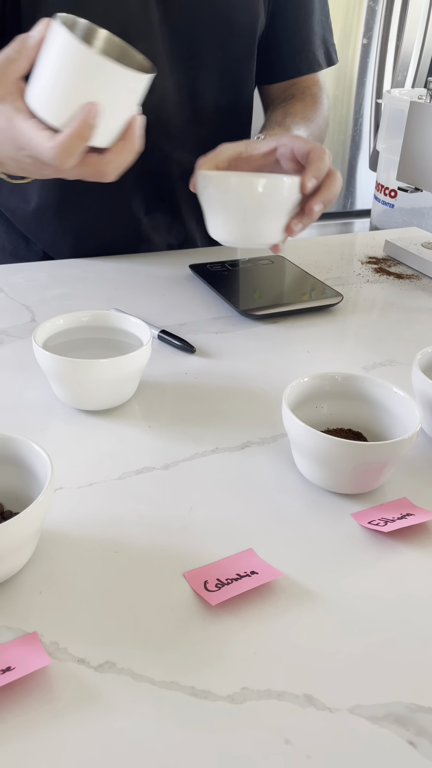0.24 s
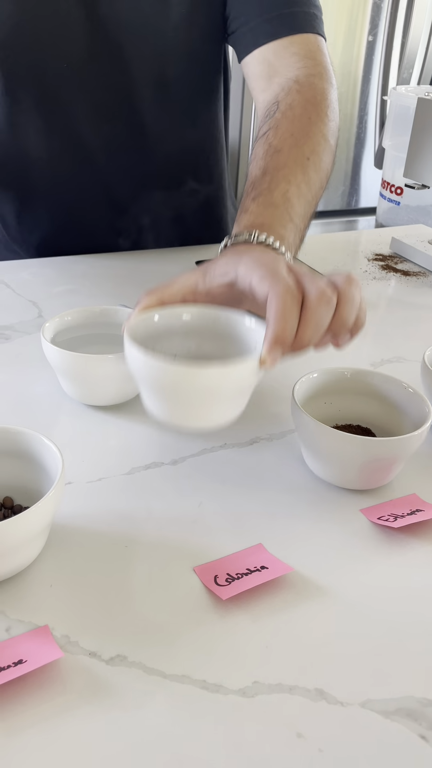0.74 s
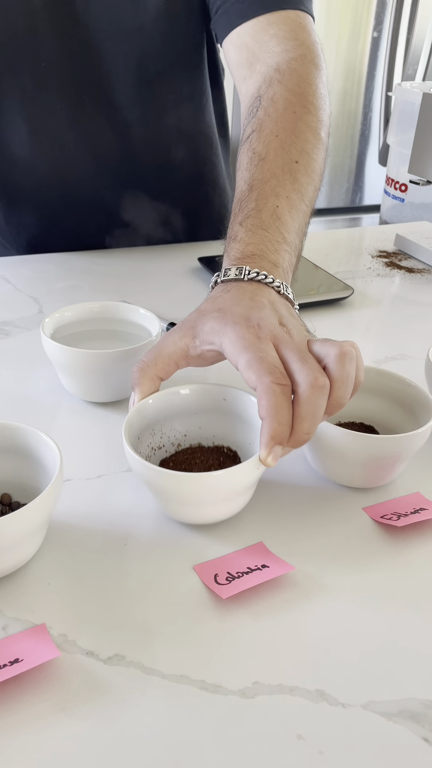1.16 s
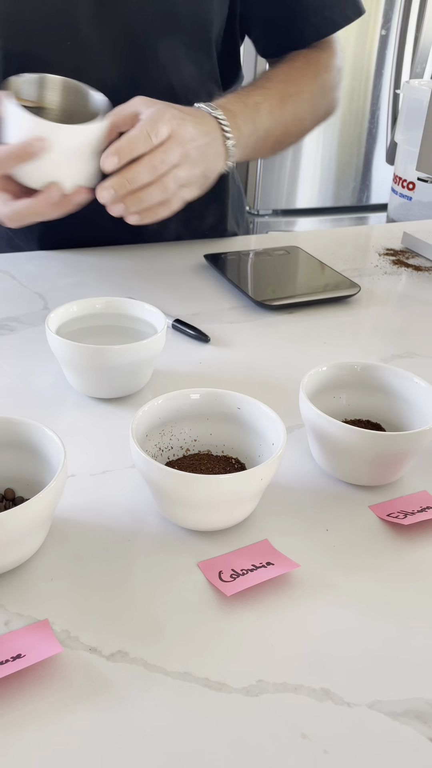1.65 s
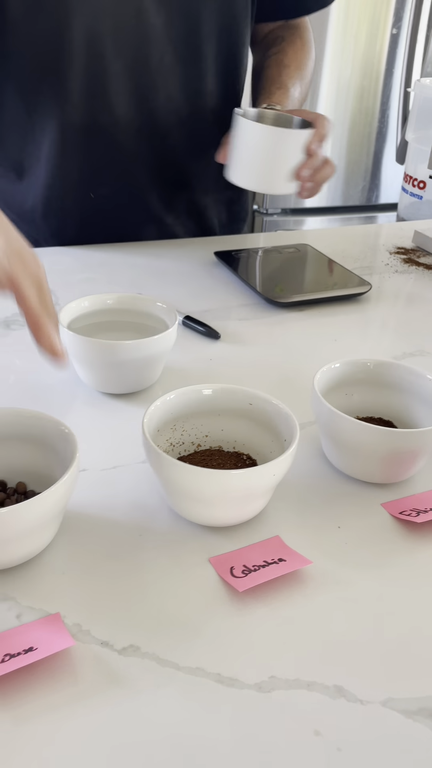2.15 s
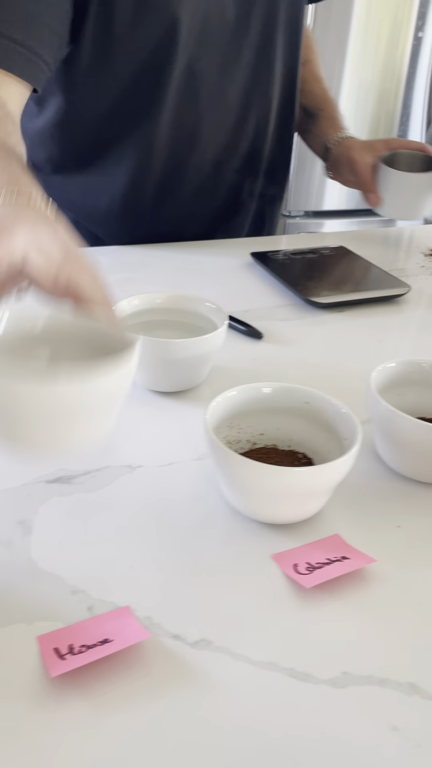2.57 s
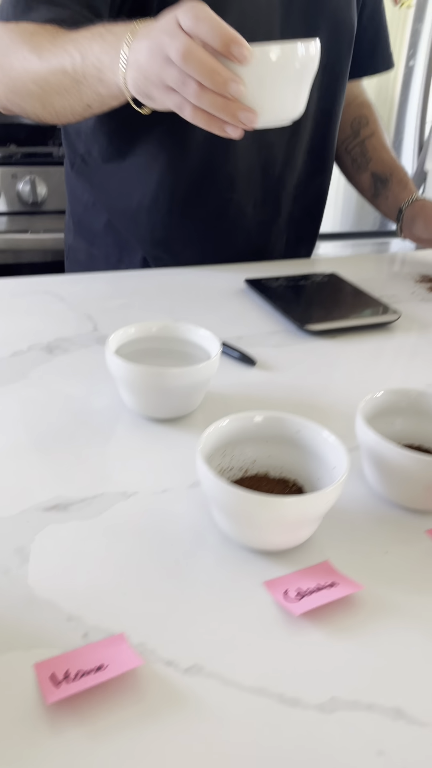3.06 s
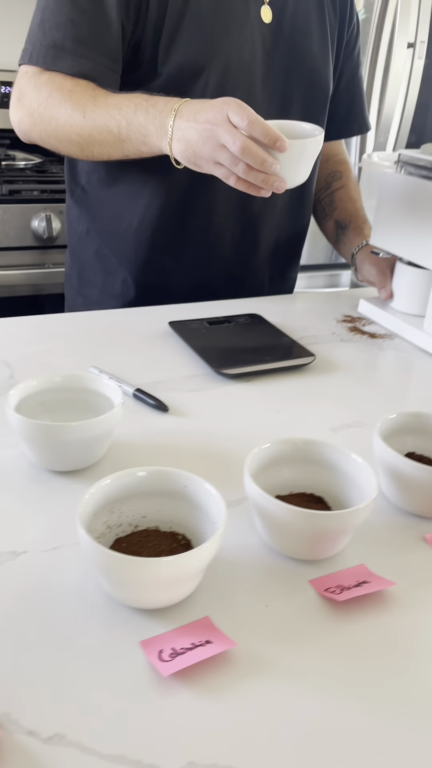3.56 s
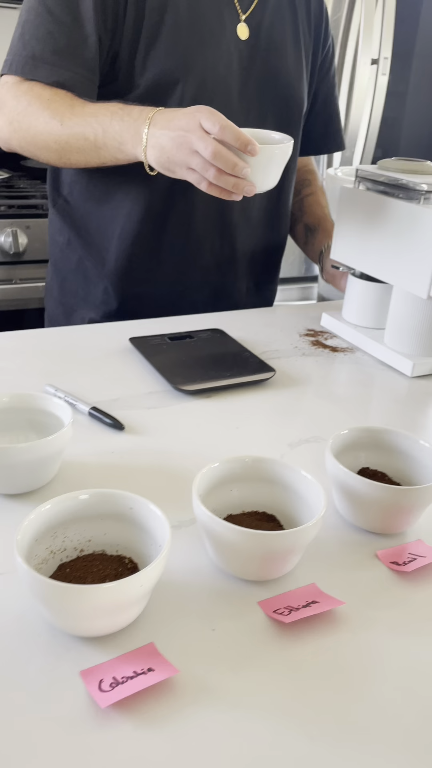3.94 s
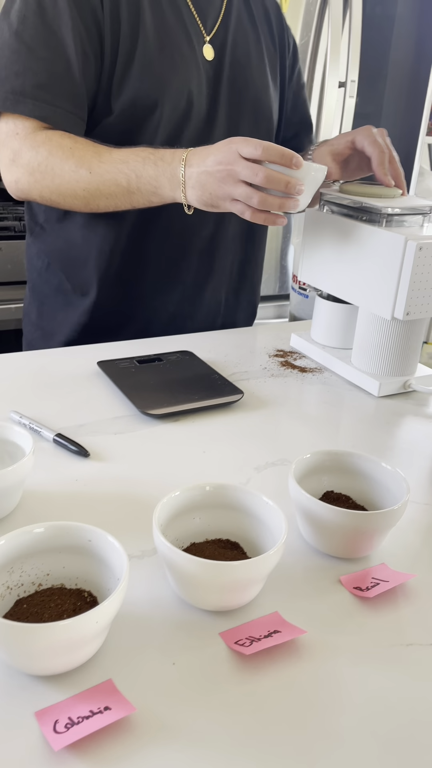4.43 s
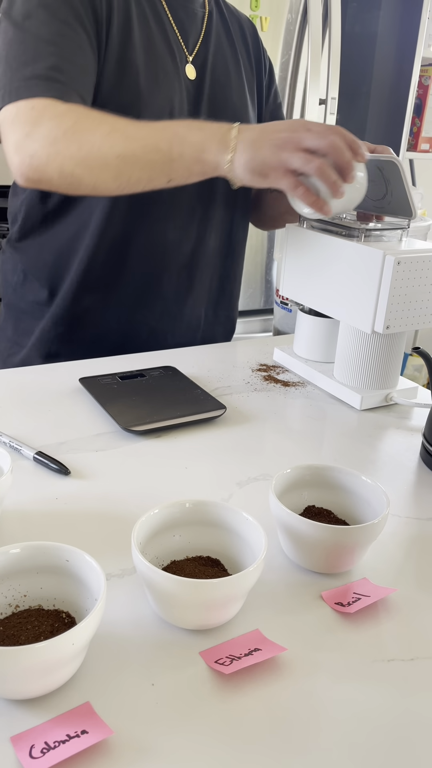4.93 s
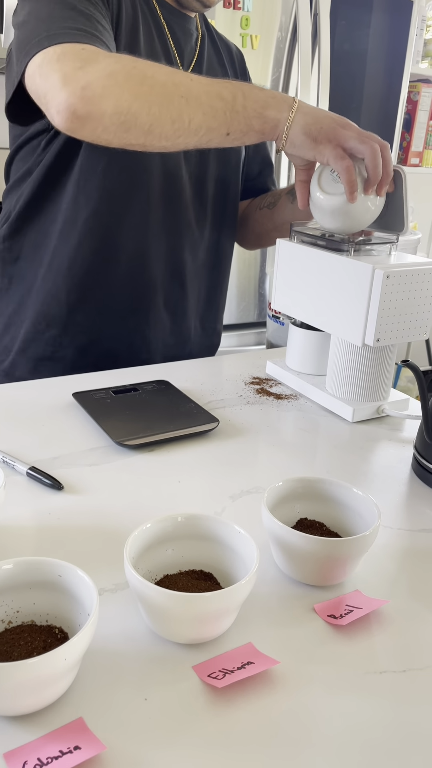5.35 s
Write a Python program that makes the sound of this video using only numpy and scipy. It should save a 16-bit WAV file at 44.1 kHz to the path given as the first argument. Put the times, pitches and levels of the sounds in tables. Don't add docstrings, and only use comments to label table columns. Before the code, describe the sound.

In a quiet hard-walled kitchen, faint fingertip ticks lead to a loud double knock of a ceramic bowl landing on stone. Another bowl drags off with a short gritty ring. A metal cup knocks and scrapes into a grinder farther away, a hollow plastic lid clicks open, and beans clatter into the hopper in a fast-thinning burst. A faint motor hums beyond. Phone microphone close to the bowls.

```python
import sys
import numpy as np
from scipy import signal
from scipy.fft import rfft, irfft, next_fast_len
from scipy.io import wavfile
from scipy.ndimage import uniform_filter1d

SR = 44100
rng = np.random.default_rng(int(sys.argv[2]) if len(sys.argv) > 2 else 0)


def undo_db(level):
    steps = np.asarray(level, float) / 20
    return 10 ** steps


def store_wav(level_fs):
    pcm = np.round(np.clip(np.atleast_2d(level_fs), -1, 1) * 32767)
    wavfile.write(sys.argv[1], SR, pcm.T.astype(np.int16))


N = 246940
TIME = np.arange(N) / SR
PADDED = next_fast_len(N)
FREQ = np.fft.rfftfreq(PADDED, 1 / SR)


def level(x, db):
    return x * undo_db(db) / np.sqrt(np.mean(x ** 2))


def colour(x, spectrum):
    hz, db = np.transpose(spectrum)
    gain = undo_db(np.interp(np.log(FREQ + 1), np.log(hz), db))
    return irfft(rfft(x, PADDED) * gain, PADDED)[..., :N]


def band(x, lo_hz, hi_hz):
    return signal.sosfilt(signal.butter(2, [lo_hz, hi_hz], "bandpass", fs=SR, output="sos"), x)


def walk(rate):
    k = int(SR / rate)
    steps = np.repeat(rng.standard_normal(N // k + 1), k)
    return 0.48 * uniform_filter1d(uniform_filter1d(steps, k), k)[:N]


def fade(t, t60):
    return np.exp(-np.log(1000) * t / t60)


def swell(peak_s, rise_s, fall_s, db):
    return undo_db(db - 20 * np.maximum((peak_s - TIME) / rise_s, (TIME - peak_s) / fall_s))


def add(out, start_s, sound):
    i = int(start_s * SR)
    out[i:i + len(sound)] += sound[:N - i]


def tone(hz, gain, wobble_db, rate):
    return np.sqrt(2) * np.sin(2 * np.pi * hz * TIME) * gain * undo_db(wobble_db * walk(rate))


def grains(per_second, scatter_db, t60):
    struck = rng.random(N) < per_second / SR
    sizes = struck * undo_db(scatter_db * rng.exponential(size=N))
    power = signal.lfilter([1], [1, -fade(2 / SR, t60)], sizes ** 2)
    return rng.standard_normal(N) * np.sqrt(power)


# pitch_hz, level_db (per Hz)
AIR_COLOUR = [(22, -22), (36, -6), (70, -6.5), (130, -4.5), (250, -8.5), (500, -13.5), (1000, -17),
              (2000, -23), (2800, -29), (3400, -38.5), (6000, -41), (10000, -34.5), (13000, -38),
              (15500, -58.5)]
# pitch_hz, level_db
MAINS_LINES = [(60, -62), (120, -64.5)]


def air():
    noise = level(colour(rng.standard_normal((2, N)), AIR_COLOUR), 0)
    low = signal.sosfilt(signal.butter(1, 300, fs=SR, output="sos"), noise)
    high = noise - low
    rumble = low * undo_db(-54.5 + 0.66 * TIME + 0.64 * walk(9.4))
    hiss = high * undo_db(-63.0 + 1.8 * walk(3.5))
    lines = sum(undo_db(db + 2.5 * walk(2)) * np.sin(2 * np.pi * hz * TIME) for hz, db in MAINS_LINES)
    return rumble + hiss + np.array([[1], [0]]) * lines


# start_s, level_db, pitch_hz
TICK_EVENTS = [(0.1244, -66, 6600), (0.1604, -54, 5900), (0.2368, -58, 6570), (0.395, -50, 4230),
               (0.4369, -43, 4170), (1.6665, -52.5, 6900), (1.7079, -60.5, 7100), (1.8484, -46.5, 7400),
               (2.0134, -73, 4120), (2.266, -53, 4260), (2.4199, -44, 5580), (2.458, -65, 5390),
               (2.51, -46.5, 6300), (4.1724, -71.5, 6900)]


def ticks():
    out, t = np.zeros(N), TIME[:1500]
    for start_s, db, hz in TICK_EVENTS:
        click = 0.5 * np.diff(rng.standard_normal(len(t) + 1)) * fade(t, 0.031)
        pitched = 0.9 * band(click, hz / 1.15, hz * 0.93)
        broad = click * undo_db(0.8 * (db + 42.5))
        ring = 0.2 * np.sin(2 * np.pi * hz * t) * fade(t, 0.015)
        add(out, start_s, undo_db(db) * (broad + pitched + ring))
    return out


# peak_s, rise_s, fall_s (for 20 dB), dull_rub_db, fine_rustle_db
GESTURES = [(0.14, .015, .03, -73, -95), (0.394, 0.088, .07, -58, -74), (0.434, .01, 0.128, -57, -70.5),
            (0.56, .2, 0.36, -71.5, -74.5), (0.918, 0.012, 0.17, -55, -83), (1.03, 0.16, 0.17, -70, -79.5),
            (1.5, 0.18, 0.073, -50.5, -71), (1.67, 0.028, 0.14, -78, -77.5), (1.766, 0.061, 0.17, -54, -62),
            (2.018, .03, 0.18, -62.5, -71.5), (2.334, .12, .12, -91, -77.5),
            (2.41, 0.13, 0.23, -74.5, -64.5), (2.65, 0.27, 0.32, -78, -83.5), (2.848, .04, 0.2, -71, -81),
            (3.05, .03, .2, -56, -57), (3.36, 0.23, .05, -44, -57.5), (3.384, 0.018, 0.079, -53, -54.5),
            (3.54, 0.4, 0.53, -51.5, -67), (3.64, 0.011, 0.043, -51, -55), (3.71, 0.016, 0.061, -69, -49),
            (4.33, 0.21, .02, -58, -66.5), (4.445, 0.011, 0.023, -56, -42), (4.97, 0.038, 0.49, -62, -52),
            (5.135, .08, 0.05, -76, -53.5)]
# pitch_hz, level_db (per Hz)
RUB_COLOUR = [(400, -18), (700, -0.5), (1400, -2), (2200, -11.5), (2700, -0.5), (3200, -10.5), (5000, -21)]
# pitch_hz, level_db (per Hz)
RUSTLE_COLOUR = [(2500, -9), (3500, -2), (5400, -9.5), (5900, 2), (6500, -11), (9000, 5.5), (11000, -9),
                 (13000, -2.5), (15500, -9.5)]


def handling():
    rub = level(colour(grains(2507, 0.79, 0.01), RUB_COLOUR), -12.5)
    rustle = level(colour(grains(2500, 2.0, 0.0094), RUSTLE_COLOUR), 0.23)
    out = np.zeros(N)
    for peak_s, rise_s, fall_s, dull_db, fine_db in GESTURES:
        friction = rub * undo_db(dull_db) + rustle * undo_db(fine_db)
        out += swell(peak_s, rise_s, fall_s, 0) * friction
    return out


# pitch_ratio (to the thud), level_db
THUD_PARTIALS = [(0.548, -6), (0.679, -7.5), (.83, -4), (1, 5), (1.2, -8), (1.448, 4), (1.752, -8.5),
                 (2.103, -18)]


def blows(table, modes, clack_t60, crack_hz, crack_t60, rattle_t60, ring_db):
    out, t = np.zeros((2, N)), TIME[:SR // 4]
    column = t[:, None]
    mode_hz, mode_db, mode_t60 = np.transpose(modes)
    ratio, share_db = np.transpose(THUD_PARTIALS)
    click = 1.0 * (t == 0)
    for start_s, db, hz, clack_db, crack_db in table:
        chance, noise = rng.standard_normal((2, 20)), rng.standard_normal((3, len(t)))

        cycles = hz * ratio * column
        partials = np.sin(2 * np.pi * cycles + 0.13 * chance[0, :len(ratio)])
        thud = (partials * fade(cycles, 5.5)) @ undo_db(share_db - 3.5)
        thud = thud * (1 - np.exp(-(1.3 * hz * t) ** 2))

        swing = np.sin(2 * np.pi * mode_hz * column) * (1 - np.exp(-(mode_hz * column) ** 2))
        body = (swing * fade(column, mode_t60)) @ undo_db(mode_db + 1.5 * chance[1, :len(modes)])
        rattle = click + noise[0] * fade(t, rattle_t60) / 35
        rattle = rattle / np.linalg.norm(rattle)
        ring = undo_db(ring_db - 0.14 * db) * signal.fftconvolve(body, rattle)[:len(t)]

        clack = band(band(noise[1] * fade(t, clack_t60), 1170, 3600), 1170, 3600)
        clack = undo_db(clack_db + 6.0) * clack
        crack = undo_db(crack_db) * band(noise[2] * fade(t, crack_t60), crack_hz, 14500)

        edges = (0.5 * hz, 2.13 * hz), (1500, 2900), (crack_hz, 12000)
        spread = 0
        for edge, part in zip(edges, (thud, clack, crack)):
            even = band(band(click, *edge), *edge)
            spread = spread + even * np.linalg.norm(part) / np.linalg.norm(even)
        add(out[0], start_s, undo_db(db) * (thud + clack + crack + ring))
        add(out[1], start_s, undo_db(db) * (spread + 0.67 * ring))
    return signal.sosfilt(signal.butter(2, 110, "highpass", fs=SR, output="sos"), out)


# start_s, thud_db, thud_hz, clack_db, crack_db (last two relative to the thud)
BOWL_HITS = [
    (0.475, -46, 1040, -15, -20),
    (1.062, -29.5, 1250, -12.5, -40.5),
    (1.071, 3.5, 1206, -24, -51.5),
    (1.226, 1.5, 1220, -19, -25),
    (1.241, -3.5, 1220, -8, -32),
]
# pitch_hz, level_db, t60_s
BOWL_MODES = [(137.9, -18, 0.25), (239.4, -19, 0.15), (405, -27, 0.24), (530, -3.5, 0.031), (816, 0, 0.06),
              (912, -2.5, 0.036), (1121, -3, 0.04), (1216, -5, 0.05), (1332, 0, 0.033), (1510, -4, 0.035),
              (1750, -13, 0.064), (1843, -6, 0.06), (2058, -9, 0.031), (2550, -30.5, 0.16),
              (3015, -34, 0.2)]
# pitch_hz, level_db, t60_s
GLAZE_MODES = [(9150, -34, .12), (13200, -31, .09), (13400, -31, .07), (13600, -34, .06)]


def bowl():
    return blows(BOWL_HITS, BOWL_MODES + GLAZE_MODES, clack_t60=0.021, crack_hz=4200, crack_t60=0.0074,
                 rattle_t60=0.052, ring_db=-14.5)


# peak_s, rise_s, fall_s (for 20 dB), level_db, pitch_hz
CLINK_EVENTS = [(.476, 0.0057, 0.027, -60, 4544), (.926, .014, 0.022, -80, 4515)]


def clinks():
    return sum(tone(hz, swell(*shape), 3, 33) for *shape, hz in CLINK_EVENTS)


# peak_s, rise_s, fall_s (for 20 dB), level_db
DRAG_SWELL = [(2.382, .045, .04, -35)]


def drag():
    t = TIME[:SR // 5, None]
    hz, db, t60 = np.transpose(BOWL_MODES + GLAZE_MODES)
    tilt_db = np.where(hz > 5000, 12, -8 * abs(np.log2(hz / 1200)))
    body = (np.sin(2 * np.pi * hz * t) * fade(t, 0.8 * t60)) @ undo_db(db + tilt_db)
    slips = level(signal.fftconvolve(grains(900, 4.6, 0.0047), body)[:N], 0)
    return slips * swell(*DRAG_SWELL[0])


# start_s, thud_db, thud_hz, clack_db, crack_db (last two
CUP_HITS = [(2.841, -24, 750, -21, -28), (2.852, -51, 780, -42, -39), (3.018, -24, 750, -4, -7),
            (3.336, -32.5, 1350, -10, -38.5), (3.424, -37, 698, 0.5, -28), (3.453, -43, 465, -1.5, -11),
            (3.611, -42, 686, -19, -38), (3.636, -56, 490, 13.5, -28), (3.685, -25, 513, -22, -35),
            (3.719, -30.5, 840, -2, -18), (3.724, -31, 630, -0.5, -19), (3.741, -23.5, 675, -41, 6),
            (3.748, -21, 600, -29, -6)]
# pitch_hz, level_db, t60_s
CUP_MODES = [(137, -1.5, 0.25), (267, -1, 0.1), (512, -5.5, 0.16), (689, 10.5, 0.035), (779, -2, 0.13),
             (1148, -0.5, 0.041), (1430, -17, 0.18), (1957, -11, 0.05), (2506, -13, 0.05),
             (2870, -42, 0.03), (4560, -28, 0.12), (5900, -26, 0.1)]


def cup():
    return blows(CUP_HITS, CUP_MODES, clack_t60=0.011, crack_hz=4730, crack_t60=0.013,
                 rattle_t60=0.063, ring_db=-23)


# peak_s, rise_s, fall_s (for 20 dB), level_db, pitch_hz
SQUEAK_EVENTS = [(3.565, .15, .1, -45, 476)]


def squeak():
    return sum(tone(hz, swell(*shape), 1.2, 30) for *shape, hz in SQUEAK_EVENTS)


def hum():
    on_s, off_s, rise_s, stop_s = 4.12, 5.32, 0.12, 0.03
    running = np.clip(np.minimum((TIME - on_s) / rise_s, (off_s - TIME) / stop_s), 0, 1)
    sagging_db = -53 - 1.5 * (TIME - on_s)
    return tone(132.4, running * undo_db(sagging_db), 2.6, 2.8)


# start_s, thud_db, thud_hz, clack_db, crack_db (last two relative to the thud)
LID_HITS = [
    (4.238, -40, 151, -13, -24),
    (4.26, -39, 357, -12.5, -30),
    (4.301, -33, 151, -20, -32),
    (4.338, -23, 490, -15, -17.5),
    (4.441, -3.5, 498, -12, -16.5),
    (4.775, -27.5, 400, -15, -26),
    (4.792, -22, 390, -14, -21),
    (4.971, -13, 540, -16, -19),
]
# pitch_hz, level_db, t60_s
LID_MODES = [(142, -18, 0.095), (240, 1, 0.035), (294, -9, 0.027), (400, -6, 0.033), (498, -2, 0.068),
             (581, -9, .045), (818, -8, 0.03), (1194, -4, 0.024), (1427, -14.5, 0.091), (1690, 2, 0.01),
             (2340, -24, 0.11), (3480, -9.5, 0.025), (4600, -48, 0.09), (6260, -26, 0.045)]


def lid():
    return blows(LID_HITS, LID_MODES, clack_t60=0.033, crack_hz=3580, crack_t60=0.032,
                 rattle_t60=0.078, ring_db=-14.5)


# start_s, level_db
BEAN_STRIKES = [(5.1425, -15), (5.1515, -20.5), (5.1577, -14), (5.1685, -4), (5.1689, -9.5), (5.1737, -21),
                (5.1807, -18), (5.1864, -32), (5.2014, -12.5), (5.2298, -24), (5.2551, -15.5),
                (5.3074, -30.5), (5.3421, -18), (5.4413, -28.5), (5.4876, -35), (5.5795, -36.5)]
# pitch_hz, level_db (per Hz)
HOPPER_COLOUR = [(300, -39), (600, -21.5), (900, -9), (1500, -10.5), (2200, -3), (3200, -7), (4500, -5.5),
                 (6000, -5.5), (8000, -2.5), (10500, -3.5), (13000, -6), (15500, -11.5)]


def beans():
    pour_s, empty_s = 5.168, 5.345
    late = np.maximum(TIME - empty_s, 0)
    flow_db = -26 - 50.5 * (TIME - late - pour_s)
    flow_db = flow_db - 74 * late - 3.5 * np.minimum(late / 0.022, 1)
    shower = level(grains(2600, 1.9, 0.004), 0) * undo_db(flow_db) * (TIME > pour_s)
    for start_s, db in BEAN_STRIKES:
        add(shower, start_s, undo_db(db - 4.5) * rng.standard_normal(900) * fade(TIME[:900], 0.011))
    return level(colour(shower, HOPPER_COLOUR), 10 * np.log10(np.mean(shower ** 2)))


# pitch_hz, level_db
ROOM_BANDS = [(150, -9.5), (400, -6.5), (1000, -6.5), (2500, -9), (6000, -12.5), (12000, -12.5)]
ROOM_DECAYS = [.38, .42, .48, .47, .43, .33]


def room(x):
    t = TIME[:int(0.8 * SR)]
    tail = 0
    for (hz, db), t60 in zip(ROOM_BANDS, ROOM_DECAYS):
        phase = np.exp(2j * np.pi * rng.random((2, len(t) // 2 + 1)))
        even = irfft(phase, len(t)) * np.sqrt(len(t))
        noise = band(even, hz / 1.66, hz * 1.746)
        unit_energy = np.sqrt(2 * np.log(1000) / t60 / SR)
        tail = tail + undo_db(db) * noise * fade(t, t60) * unit_energy
    gap = np.clip((t - 0.003) / 0.0018, 0, 1)
    return signal.fftconvolve(x[None], tail * gap, axes=1)[:, :N]


def scene():
    near = bowl() + drag() + ticks() + clinks()
    far = cup() + lid() + beans() + handling() + squeak() + hum()
    shared = near[0] + far[0]
    turned = irfft(1j * rfft(shared, PADDED), PADDED)[:N]
    direct = np.array([shared, 0.29 * near[0] + 0.037 * turned])
    return direct + room(near[1] + undo_db(4.0) * far[1]) + air()


def low_pass(x):
    return signal.sosfilt(signal.butter(12, 16670, fs=SR, output="sos"), x)


# pitch_hz, level_db
MIC_TREBLE = [(12000, 0.5), (13500, -1.5), (14500, -5.5), (15800, -15), (16400, -52.5)]
# pitch_hz, lag_radians
RIGHT_LAG = [(0, 0), (1000, .3), (1700, .2), (2500, .4), (3300, 2), (4500, 2), (5200, 0), (5700, .2),
             (6600, 1.1), (8000, 2), (8700, 2.6), (9200, 3.14), (11350, 3.14), (11800, 4.0), (13400, 5.2),
             (14100, 6.28)]
# pitch_hz, level_db
UNSHARED = [(30, -16.5), (100, -21.5), (250, -11.5), (800, -4), (1700, -11.5), (2500, -7.5), (3300, 1),
            (4500, 5), (5700, -6), (6600, 0.5), (8400, -33), (9100, -9), (11400, -1.5), (11900, -10.5),
            (13400, -17.5), (14100, -41)]
ANTIPHASE = 9250, 11350


def record(dry):
    shared, apart = rfft(dry, PADDED) * undo_db(np.interp(FREQ, *np.transpose(MIC_TREBLE)))
    apart = apart * undo_db(np.interp(FREQ, *np.transpose(UNSHARED)))
    apart = apart * ((FREQ < ANTIPHASE[0]) | (FREQ > ANTIPHASE[1]))
    turn = np.exp(1j * np.interp(FREQ, *np.transpose(RIGHT_LAG)) / 2)
    left, right = (shared + apart) * turn, (shared - apart) / turn
    ports = irfft(np.array([left, right]), PADDED)[:, :N]
    return low_pass(ports)


dry = scene()
out = record(dry)
store_wav(out)
```